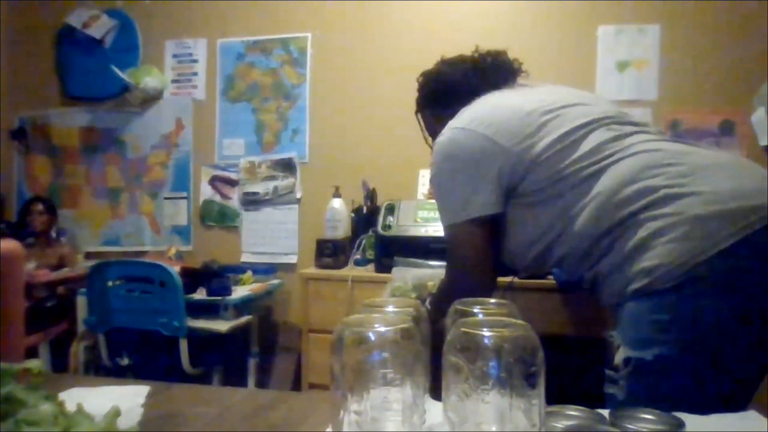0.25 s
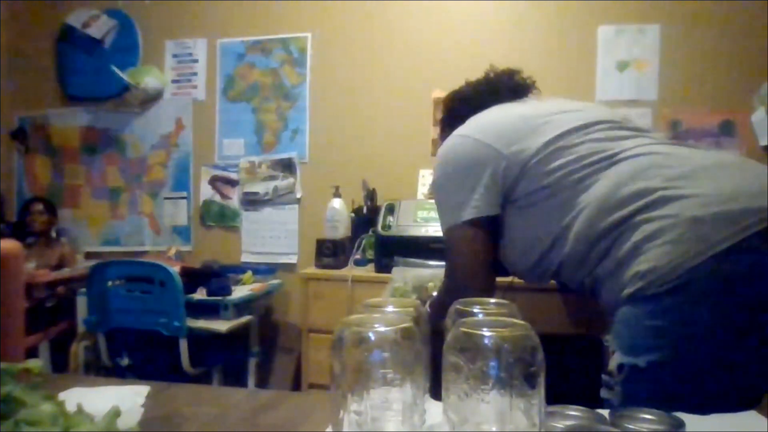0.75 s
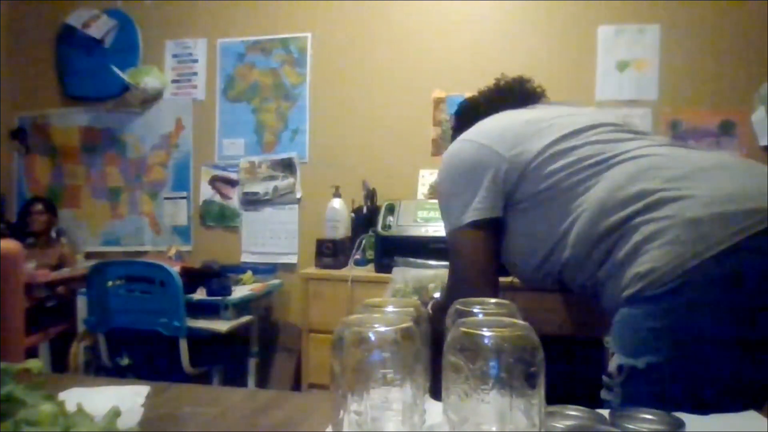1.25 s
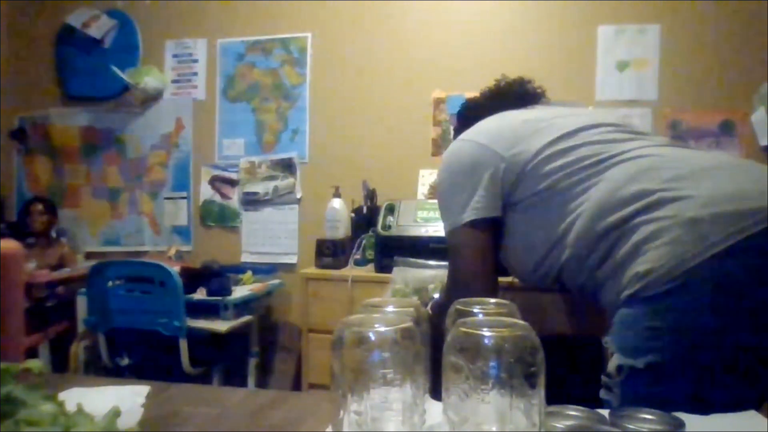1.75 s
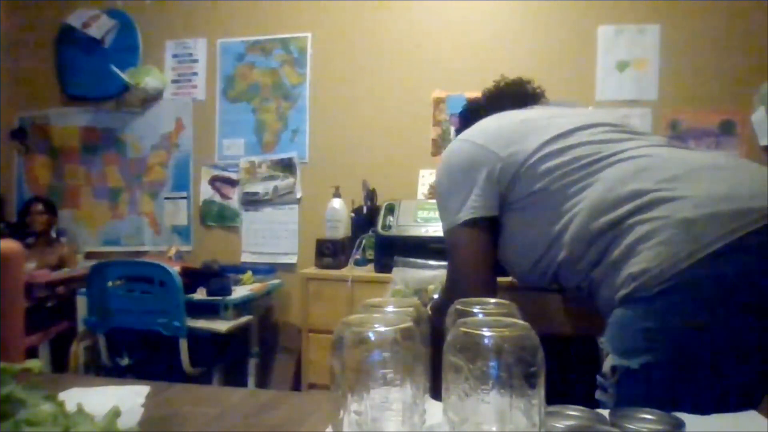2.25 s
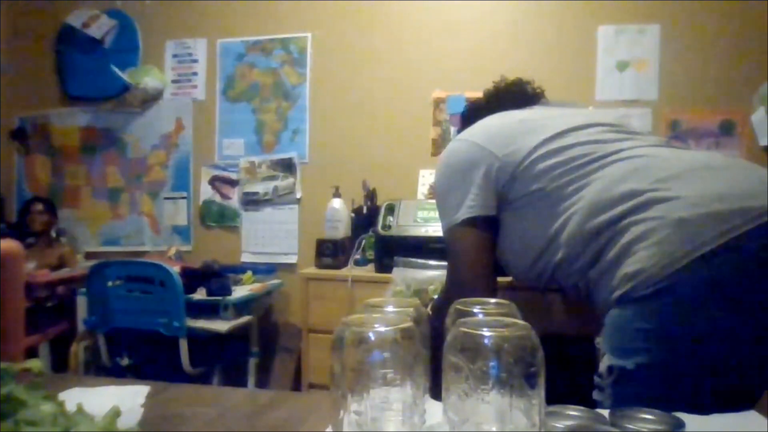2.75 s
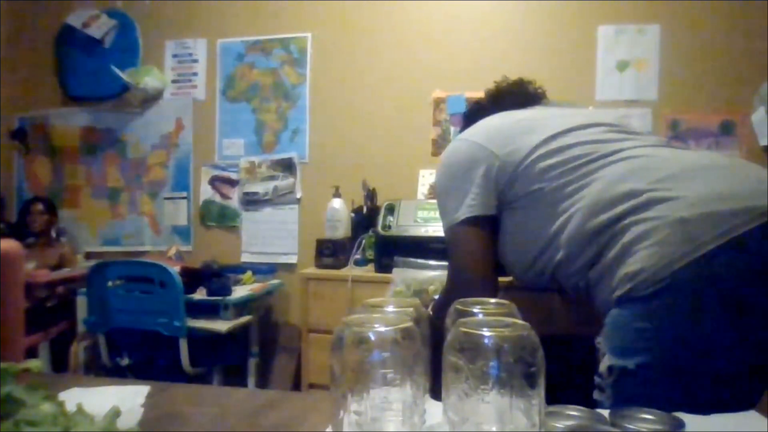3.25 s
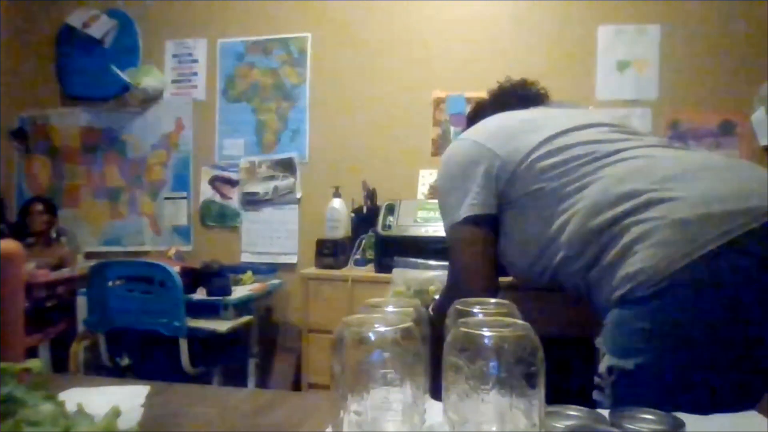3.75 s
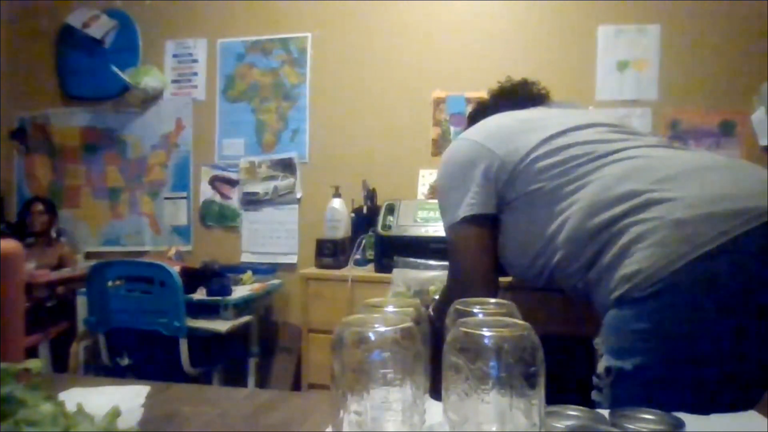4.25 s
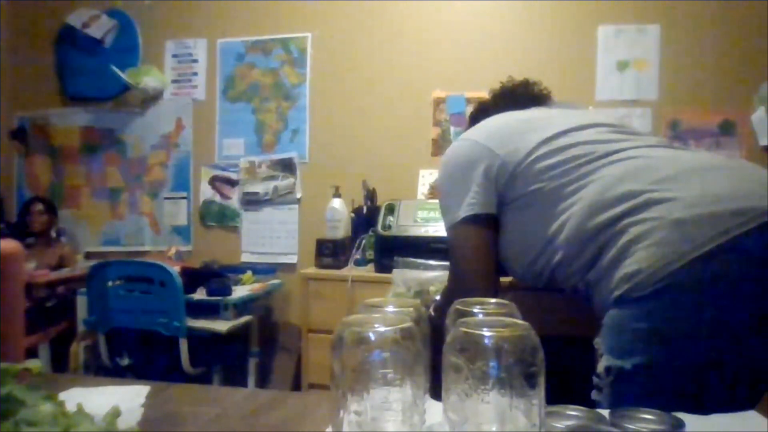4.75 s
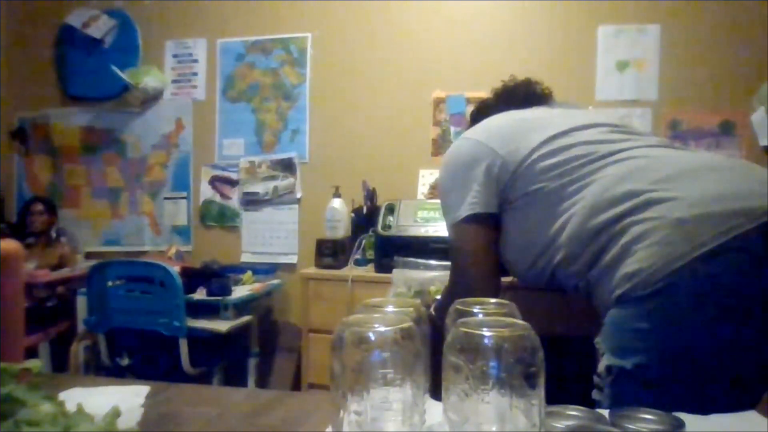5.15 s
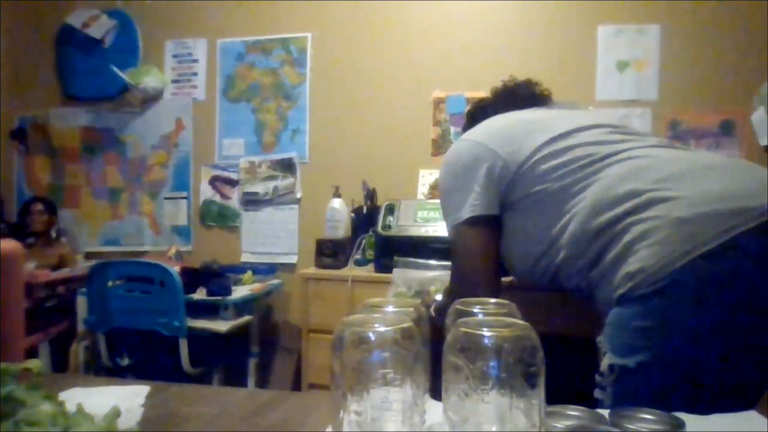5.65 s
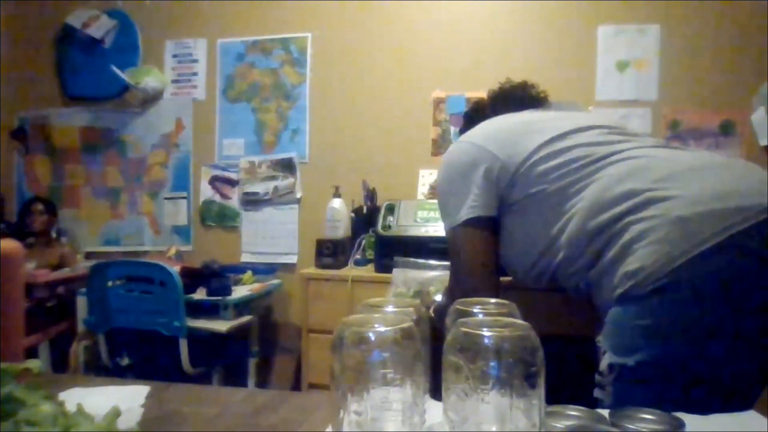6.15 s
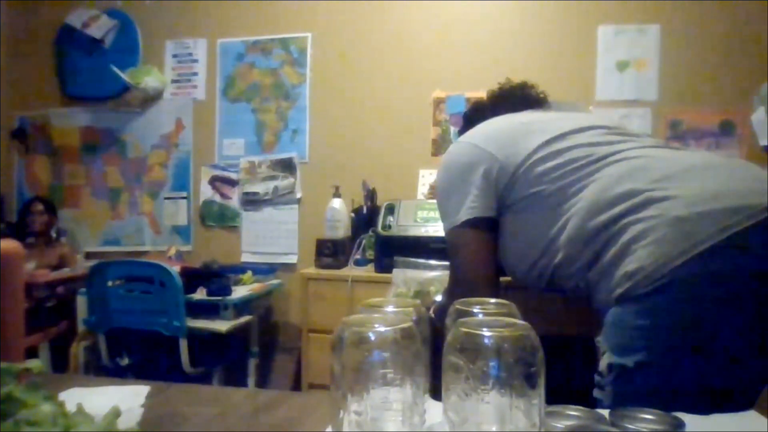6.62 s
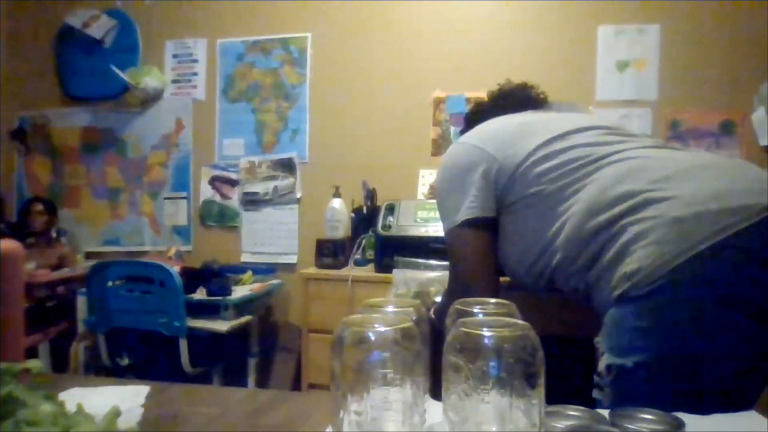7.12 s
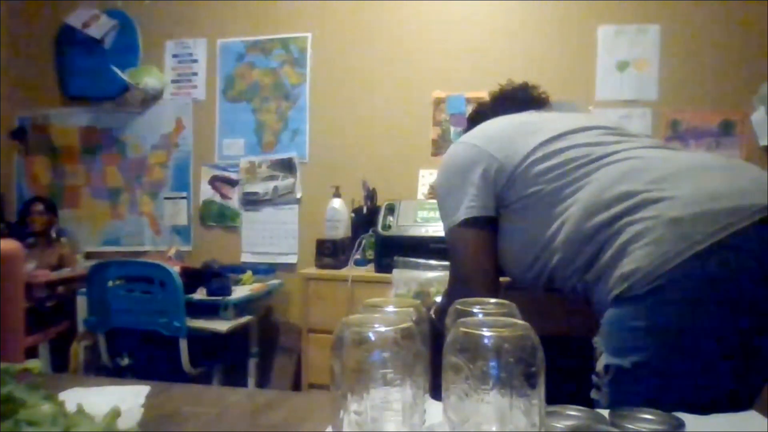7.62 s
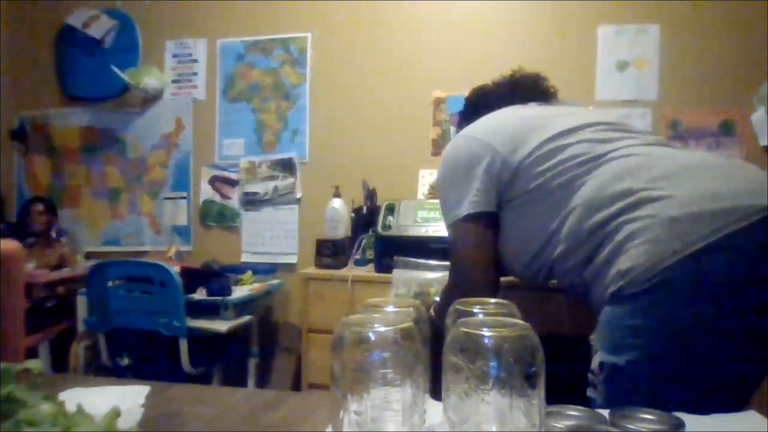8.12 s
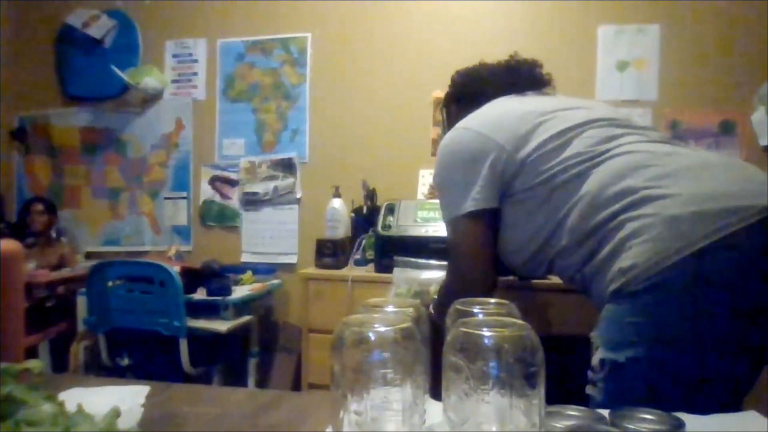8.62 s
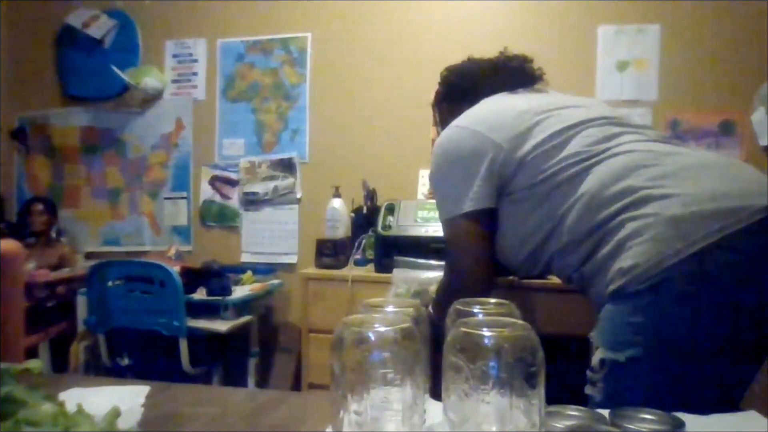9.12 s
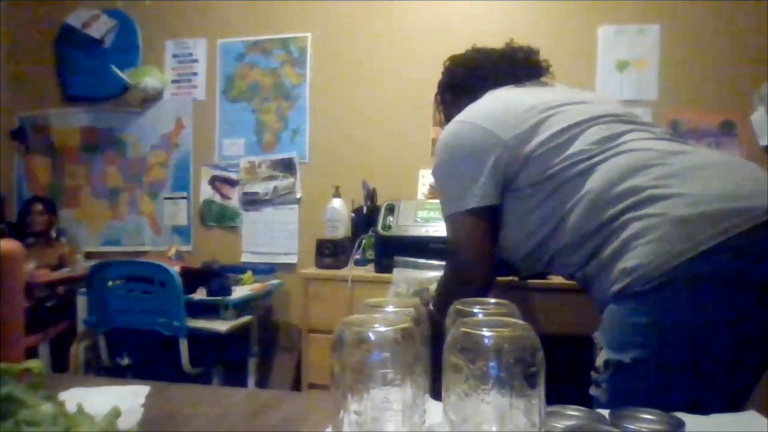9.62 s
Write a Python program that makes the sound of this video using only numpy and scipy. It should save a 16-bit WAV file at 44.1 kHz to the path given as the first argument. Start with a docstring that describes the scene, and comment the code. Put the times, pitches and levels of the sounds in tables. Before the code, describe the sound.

A small vacuum sealer pump hums steadily in a room, with low rushing air, a faint wavering high whistle, and one soft scuff near the end.

```python
"""A room, across which a small vacuum pump runs steadily, heard by two closely spaced microphones.
Motor and seven-blade fan are sums of sine waves on their shaft orders; faint side tones beat with the hum.
Air rushing through ringing cavities is noise shaped by resonances and echoes; a thin whistle of
narrow-band noise wavers and chirps above. Near the end a soft brush is a decaying burst of noise."""
import sys
import numpy as np
from scipy import signal
from scipy.fft import rfft, irfft
from scipy.io import wavfile

SR = 44100
rng = np.random.default_rng(int(sys.argv[2]) if len(sys.argv) > 2 else 0)


def file_out(sig):
    """Save sig as 16-bit WAV at sys.argv[1]."""
    # one column per channel
    cols = np.atleast_2d(sig).T
    # limit, then scale
    lim = np.clip(cols, -1, 1)
    pcm = np.round(lim * 32767).astype(np.int16)
    wavfile.write(sys.argv[1], SR, pcm)


N = 435708
TIME = np.arange(N) / SR  # s
FREQ = np.maximum(np.fft.rfftfreq(N, 1 / SR), 1)  # Hz, kept above zero for the logarithm
SIDES = np.array([[.5], [-.5]])  # left, right: half of any difference goes to each

PUMP_HZ, FAN_HZ = 57.742, 24.035  # mean turns per second
# The load on the motor grows as the bag empties, and its hum with it.
LOAD_DB_PER_S = 0.05
# Lead of the left microphone for direct sound, and travel time across the pair.
LEAD_MS, SPACING_MS = 0.12, 0.21
TOP_HZ = 15700  # upper edge of the microphones' band
BRUSH_S, BRUSH_DB = 8.91, -73  # start; dB per Hz before colour and envelope

# Motor lines; the high orders are the rotor slots' whine.
# Each row: shaft order, level in dB before trim and waver, left minus right in dB.
PUMP_LINES = [(1, -32.9, 1.9), (2, -46.7, 2.2), (3, -42.4, 0.7), (4, -46.8, 0.2), (5, -45.5, -1.5),
              (6, -49.6, -0.8), (7, -48.6, 1.4), (9, -58.5, -1.4), (10, -55.4, -2.4), (12, -61.5, -2.5),
              (13, -57.6, -2.5), (14, -59.3, -0.6), (15, -66.3, -7.0), (19, -66.1, -1.7), (21, -65.4, -1.5),
              (22, -65.0, -0.4), (27, -66.4, 2.7), (38, -68.9, 7.9), (64, -73.3, 12.6), (66, -75.0, 11.1),
              (67, -78.8, 13.1), (68, -83.6, 20.3), (70, -74.8, 2.9), (71, -72.1, 9.3), (77, -75.9, 10.4),
              (78, -74.0, -0.1)]
# Fan lines; order 7 is the blade tone.
# Each row: shaft order, level in dB before trim and flutter, left minus right in dB.
FAN_LINES = [(1, -37.1, 0.1), (6, -48.7, 1.0), (7, -26.2, 1.3), (8, -38.2, -0.4), (13, -52.1, 1.3),
             (14, -51.8, -0.2), (21, -53.2, 0.2)]
# Swell of the blade tone, used about its own mean. Each row: time in seconds, level in dB.
BLADE_SWELL = [(0.0, -27.5), (1.9, -27.5), (2.5, -25.5), (3.1, -28), (5.2, -26.3), (6.0, -28), (7.5, -27),
               (9.2, -27.5), (9.7, -26)]
# Faint tones beside the hum. Each row: frequency in Hz, level in dB before waver.
SIDE_LINES = [(139.4, -43), (255.1, -43), (370.6, -53.5)]
# Rushing air before resonances and echoes. Each row: frequency in Hz, level in dB per Hz.
AIR_SPECTRUM = [(20, -67), (70, -67), (125, -61), (240, -60.5), (400, -65), (620, -69), (1100, -73),
                (1700, -76), (2400, -82.5), (3300, -85), (4200, -87.5), (5500, -95.5), (9000, -100),
                (15500, -112)]
# Housing and room resonances that colour the air.
# Each row: centre in Hz, full width at half the lift in Hz, lift in dB.
CAVITY_RESONANCES = [(144, 10, 9.5), (154, 12, 0), (172, 6, 3.5), (197.5, 31.7, 13.5), (308.8, 2.3, 4.5),
                     (511.5, 15.4, 6.5), (745, 42, 3), (1036, 13, 4), (1096, 29, 5.5), (1263, 42, 2),
                     (1944, 34, 7.5), (2406, 70, 4.5)]
# Reflections from desk and walls. Each row: delay in ms, level in dB.
REFLECTIONS = [(4.22, -27), (12.78, -23), (28.96, -26), (37.82, -23), (41.34, -27)]
# Share of the upper rush's power that comes straight. Each row: frequency in Hz, share from 0 to 1.
DIRECT_SHARE = [(300, 0.18), (600, 0.34), (1100, 0.5), (2000, 0.42), (4000, 0.34), (9000, .3)]
# Stereo balance of the air. Each row: frequency in Hz, left minus right in dB.
AIR_BALANCE = [(170, -0.5), (500, 1.0), (1200, -1.0), (2500, 0.7), (4500, 3.0), (9000, 4.5)]
# Whistle bands before trim and flares.
# Each row: centre in Hz, half width at half amplitude in Hz, peak in dB per Hz.
WHISTLE_BANDS = [(7220, 45, -89.5), (7440, 48, -88.5)]
# Short flares of the whistle. Each row: peak time in seconds, width at half lift in seconds, lift in dB.
WHISTLE_CHIRPS = [(0.60, .07, 6), (0.83, .15, 4.5), (2.06, .06, 10), (2.76, .14, 5), (5.88, .16, 3.5),
                  (7.00, .06, 5), (7.31, .09, 6), (8.12, .12, 5)]
# Colour of the soft brush. Each row: frequency in Hz, relative level in dB.
BRUSH_COLOUR = [(700, -20), (1800, -7), (2700, 1), (3600, -11), (7000, -23), (12000, -36)]
# Microphone hiss. Each row: frequency in Hz, level in dB per Hz.
HISS_SPECTRUM = [(1000, -90), (6000, -95.5), (10000, -99), (15500, -95)]


def undb(db):
    """Amplitude ratio: a gain of ten for every 20 decibels."""
    return 10 ** (np.asarray(db) / 20)


def swing(curve):
    """Slow amplitude modulation: a level curve in dB about the mean of its points, for every sample."""
    s, db = np.transpose(curve)
    return np.interp(TIME, s, db - db.mean())


def colour(points):
    """Spectral envelope: points joined by straight lines on a log-frequency axis."""
    hz, db = np.transpose(points)
    return np.interp(np.log(FREQ), np.log(hz), db)


def bell(hz, width):
    """Resonance curve (Lorentzian): 1 at its centre and one half at half the width to either side."""
    return 1 / (1 + (2 * (FREQ - hz) / width) ** 2)


def white():
    """White noise: the spectrum of fresh random samples with unit power per Hz."""
    return rfft(rng.standard_normal(N)) * np.sqrt(SR / 2)


def walk(rate):
    """Random modulation: noise under a Gaussian low-pass of rate Hz, with mean 0 and spread 1."""
    slow = irfft(white() * np.exp(-(np.fft.rfftfreq(N, 1 / SR) / rate) ** 2), N)
    return (slow - slow.mean()) / slow.std()


def room_noise(gain, direct=0.34):
    """Spatial coherence: direct sound reaches the left first; the diffuse field is alike only in the bass."""
    direct = np.clip(direct, 0, 1)
    straight = white() * np.exp(2j * np.pi * FREQ * SIDES * LEAD_MS / 1000)
    coherence = np.sinc(2 * FREQ * SPACING_MS / 1000)
    common = white() * np.sqrt((1 + coherence) / 2)
    opposed = 2 * SIDES * white() * np.sqrt((1 - coherence) / 2)
    field = np.sqrt(direct) * straight + np.sqrt(1 - direct) * (common + opposed)
    return irfft(gain * field, N)


def tone(cycles, hz, db, pan_db):
    """Pure tone: a sine of given rms level and random starting phase, leading at the left microphone."""
    lead = SIDES * hz * LEAD_MS / 1000  # cycles
    amplitude = np.sqrt(2) * undb(db) * undb(SIDES * pan_db)
    return amplitude * np.sin(2 * np.pi * (cycles + rng.random() + lead))


def turns(hz, drift):
    """Phase as the integral of speed: turns of a shaft whose speed wanders by the share drift."""
    return np.cumsum(hz * (1 + drift * walk(0.56))) / SR


def pump(hum_db=0.1, waver_db=1.5):
    """Harmonics of rotation: order 1 grows with load; upper lines waver as paths through the room shift."""
    shaft = turns(PUMP_HZ, .00008)
    load_db = hum_db + LOAD_DB_PER_S * (TIME - TIME.mean())
    out = 0
    for order, db, pan_db in PUMP_LINES:
        if order == 1:
            change = load_db
        else:
            change = waver_db * min(order / 6, 1) * walk(1.7)
        out = out + tone(order * shaft, order * PUMP_HZ, db + change, pan_db)
    return out


def fan(blade_db=0.4, rest_db=0.3, flutter_db=0.6, blade_flutter_db=0.4):
    """Blade passing: the blade tone swells slowly; uneven blades add shaft orders that flutter in the flow."""
    shaft = turns(FAN_HZ, .0007)
    out = 0
    for order, db, pan_db in FAN_LINES:
        flutter = walk(2.9)
        if order == 7:
            change = blade_db + swing(BLADE_SWELL) + blade_flutter_db * flutter
        else:
            change = rest_db + flutter_db * min(order / 8, 1) * flutter
        out = out + tone(order * shaft, order * FAN_HZ, db + change, pan_db)
    return out


def side_tones(waver_db=1.5):
    """Beating: faint steady-pitched tones between the orders interfere with the hum."""
    return sum(tone(hz * TIME, hz, db + waver_db * walk(2.2), 0) for hz, db in SIDE_LINES)


def air(churn_top_hz=300, churn_db=0.3, gust_db=1.24, gusts_hz=6.2, flicker_db=0.47, swell_db=0.24):
    """Turbulence exciting cavities: the low part churns in quick random gusts, the upper rush only flickers."""
    lift_db = sum(db * bell(hz, width) for hz, width, db in CAVITY_RESONANCES)
    gain = undb(colour(AIR_SPECTRUM) + lift_db)
    # The reflections comb the rush and make it slightly hollow.
    echoes = sum(undb(db) * np.exp(-2j * np.pi * FREQ * ms / 1000) for ms, db in REFLECTIONS)
    gain = gain * (1 + echoes) * undb(SIDES * colour(AIR_BALANCE))
    low_share = 1 / (1 + (FREQ / churn_top_hz) ** 6)  # share of power
    churn = room_noise(gain * np.sqrt(low_share), direct=0.25)
    churn = churn * undb(churn_db + gust_db * walk(gusts_hz))
    rush = room_noise(gain * np.sqrt(1 - low_share), direct=colour(DIRECT_SHARE))
    rush = rush * undb(flicker_db * walk(12.0) + swell_db * walk(1.6))
    return churn + rush


def whistle(rest_db=-0.5, waver_db=1.5, wavers_hz=10.5, pan_db=2.5):
    """Narrow-band noise of air through a narrow gap: it wavers at random and flares in smooth chirps."""
    gain = sum(undb(db) * bell(hz, 2 * width) for hz, width, db in WHISTLE_BANDS)
    flare_db = sum(db * .5 ** ((2 * (TIME - s) / length) ** 2) for s, length, db in WHISTLE_CHIRPS)
    level_db = rest_db + flare_db + waver_db * walk(wavers_hz) + SIDES * pan_db
    return room_noise(gain, direct=0.56) * undb(level_db)


def brush(rise_s=.004, contact_s=0.024, tail_db=-6, t60_s=0.62):
    """Friction and reverberation: a short scuff of noise, then an exponential tail dying away in the room."""
    age = np.maximum(TIME - BRUSH_S, 0)
    rise = 1 - np.exp(-age / rise_s)
    contact = np.exp(-age / contact_s)
    tail = undb(tail_db) * np.exp(-np.log(1000) * age / t60_s)  # falls 60 dB in t60_s
    scuff = room_noise(undb(BRUSH_DB + colour(BRUSH_COLOUR)), direct=.1)
    return scuff * rise * (contact + tail)


def scene():
    """Superposition: the pressures of all sources add at the two microphones."""
    return pump() + fan() + side_tones() + air() + whistle() + brush()


def record(dry):
    """Self-noise and band limit: each microphone adds its own hiss, and the top is cut steeply."""
    hiss = irfft(np.array([white(), white()]) * undb(colour(HISS_SPECTRUM)), N)
    low_pass = signal.ellip(14, .1, 90, TOP_HZ, fs=SR, output="sos")
    return signal.sosfilt(low_pass, dry + hiss)


dry = scene()
out = record(dry)
file_out(out)
```